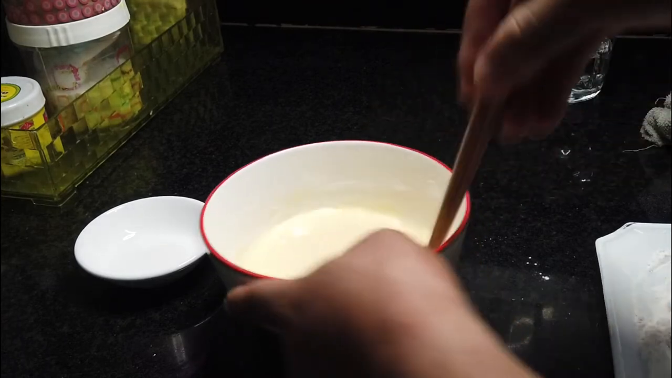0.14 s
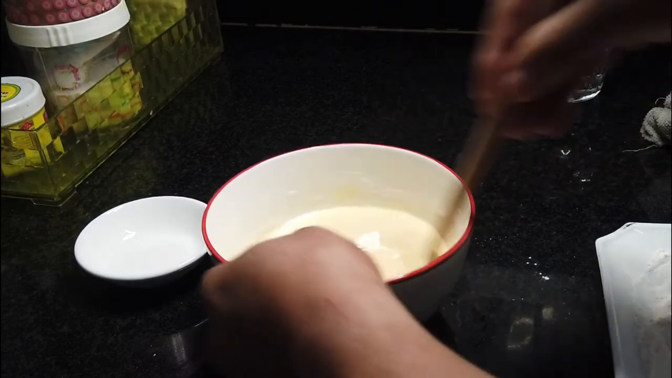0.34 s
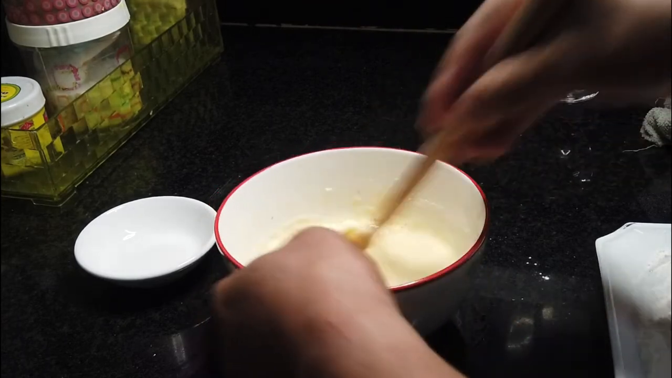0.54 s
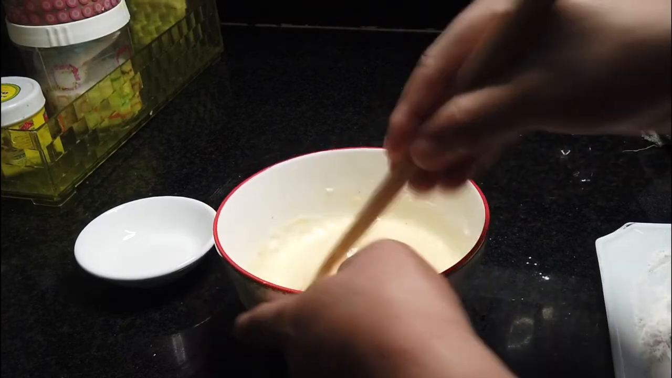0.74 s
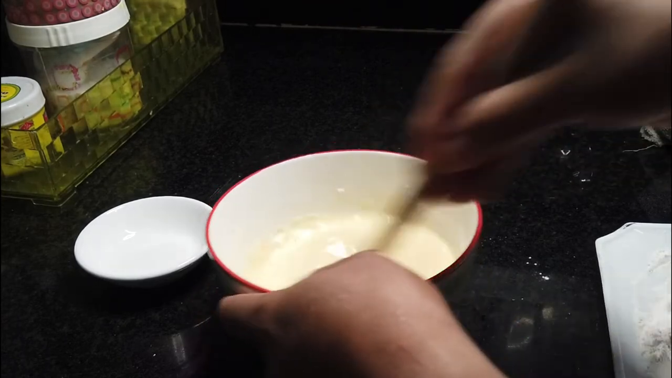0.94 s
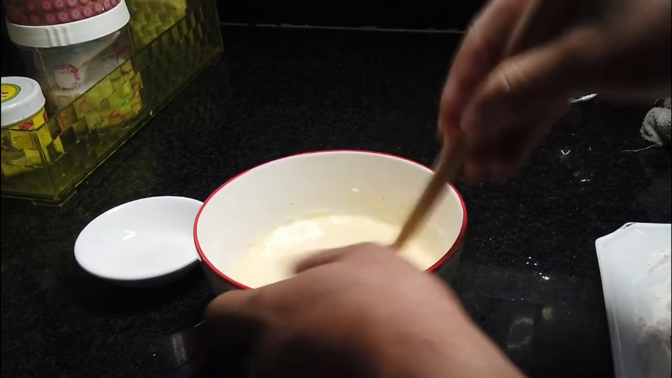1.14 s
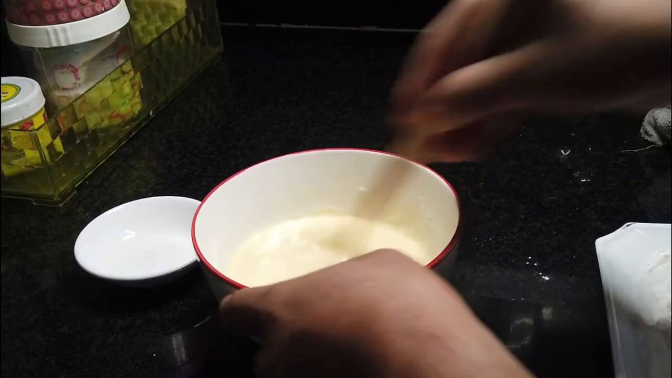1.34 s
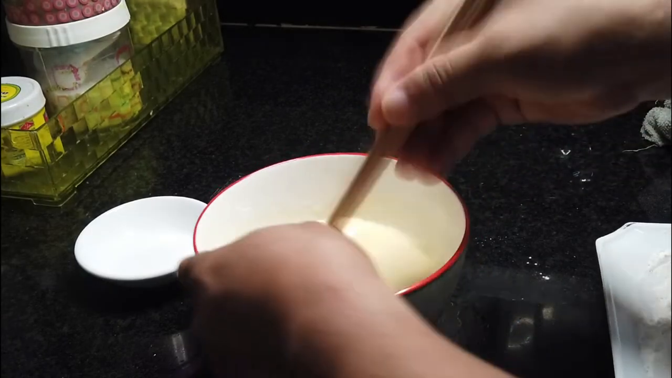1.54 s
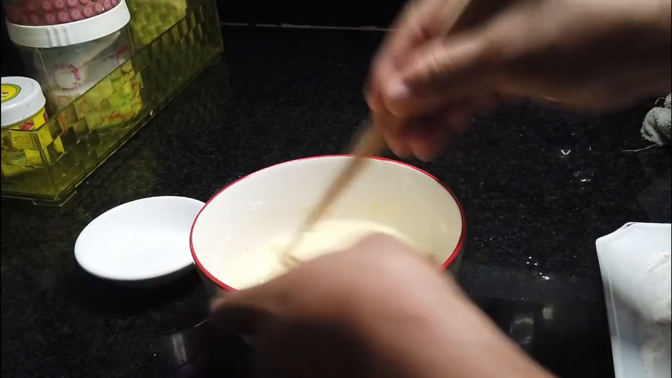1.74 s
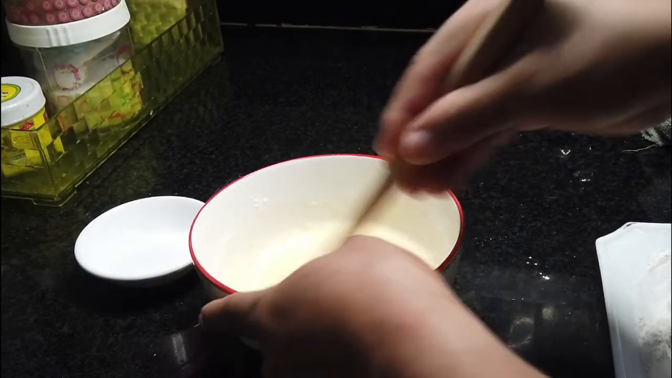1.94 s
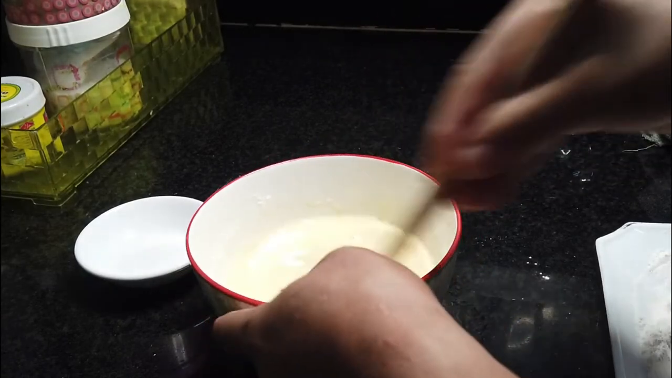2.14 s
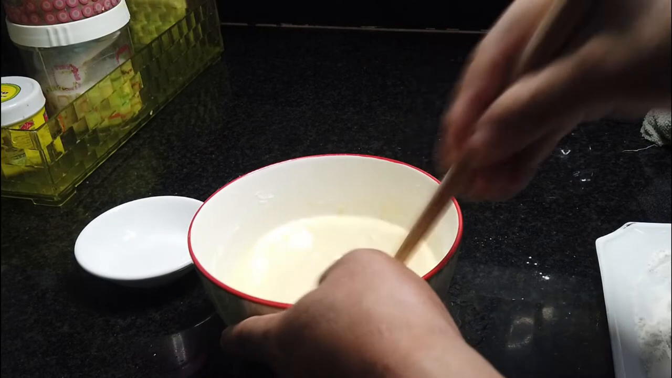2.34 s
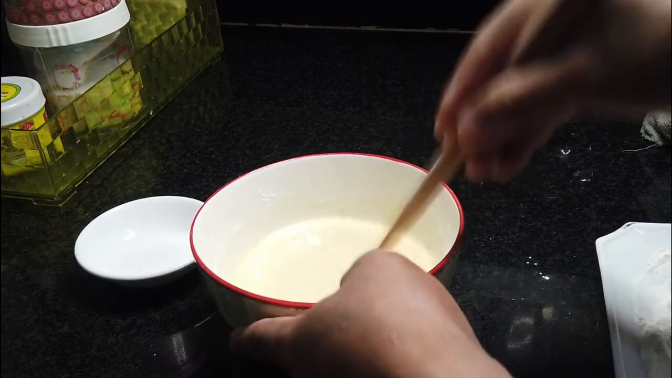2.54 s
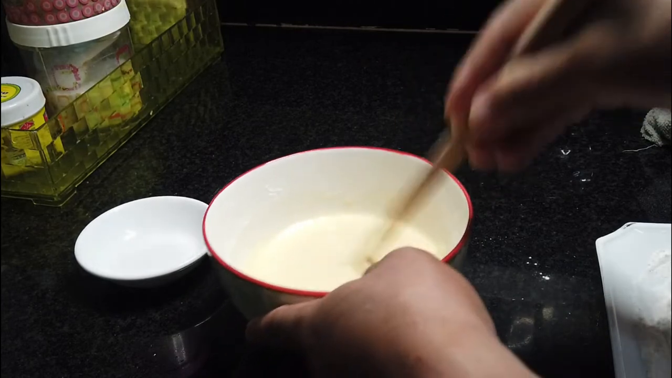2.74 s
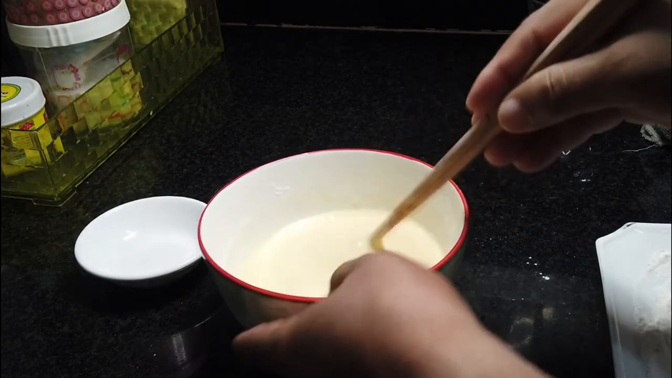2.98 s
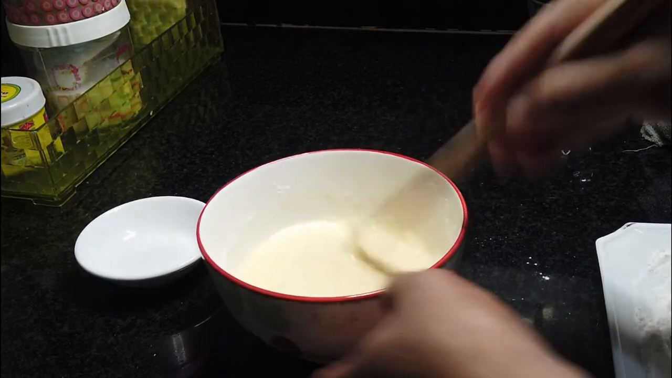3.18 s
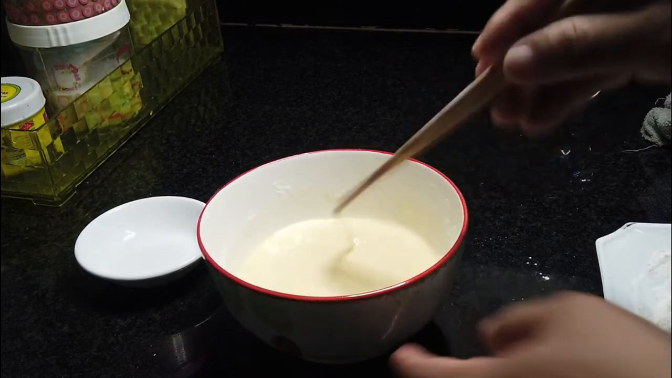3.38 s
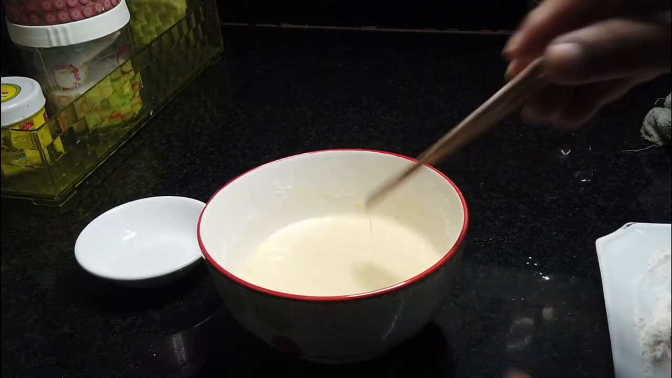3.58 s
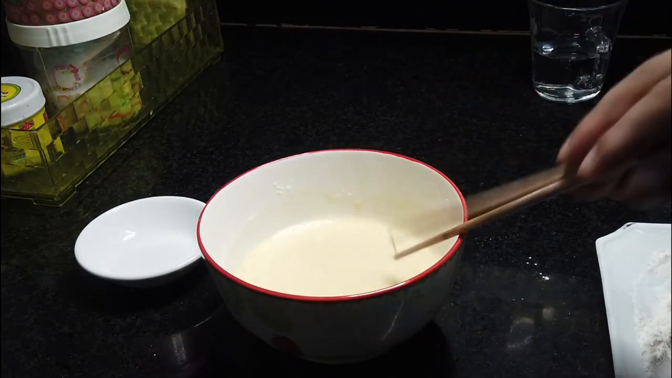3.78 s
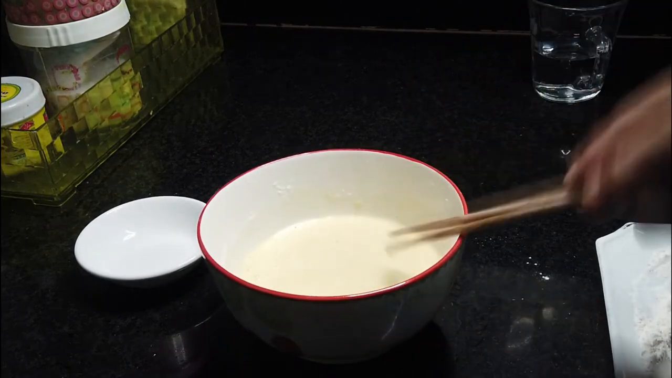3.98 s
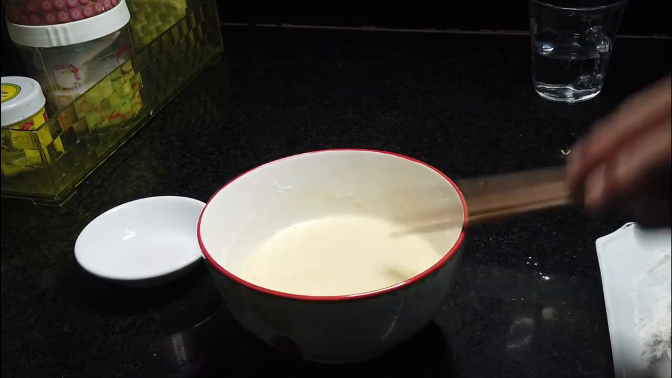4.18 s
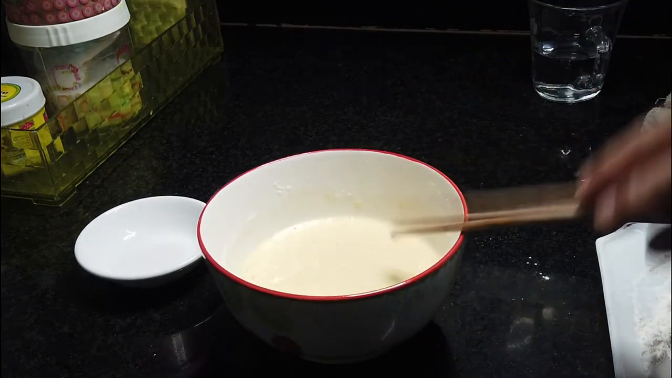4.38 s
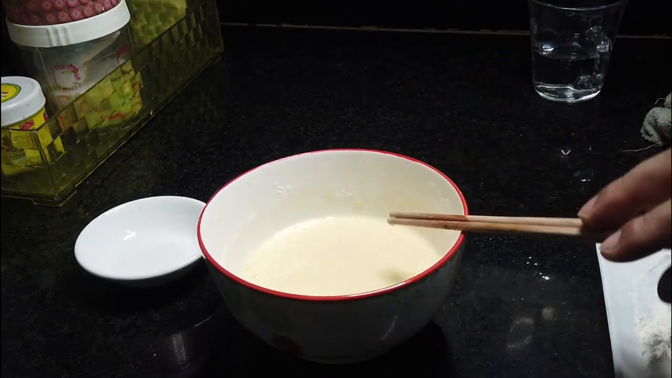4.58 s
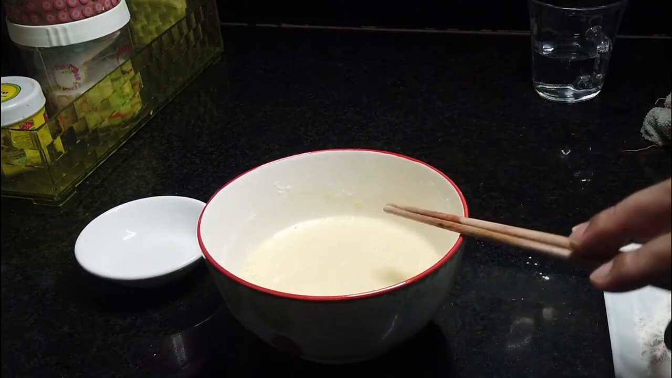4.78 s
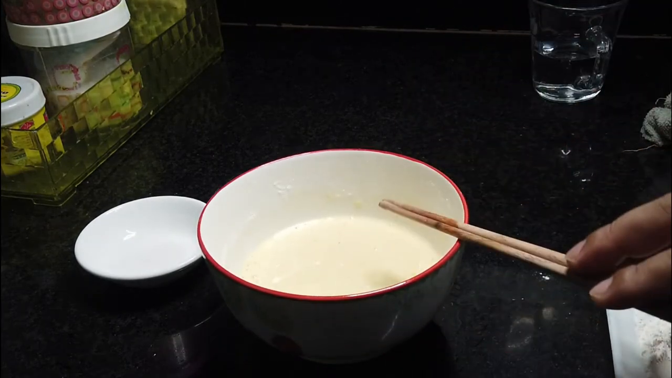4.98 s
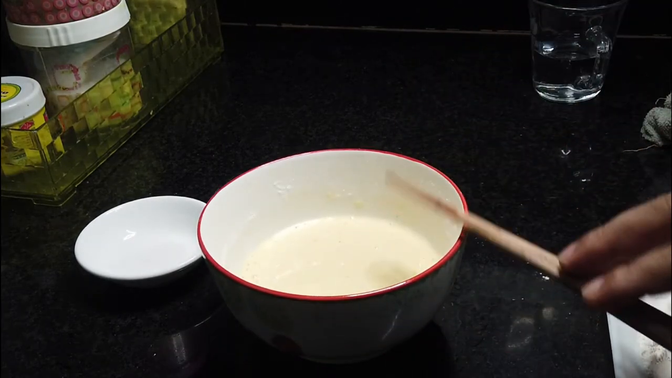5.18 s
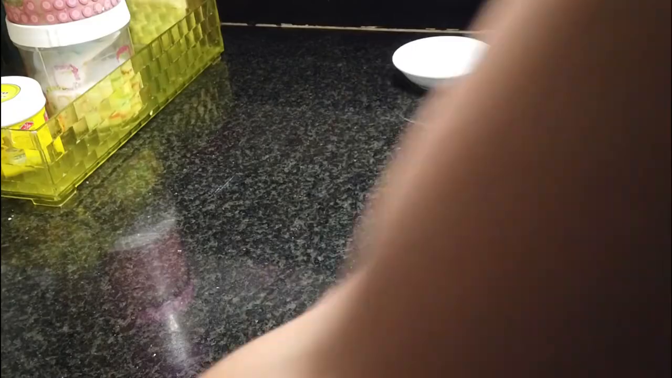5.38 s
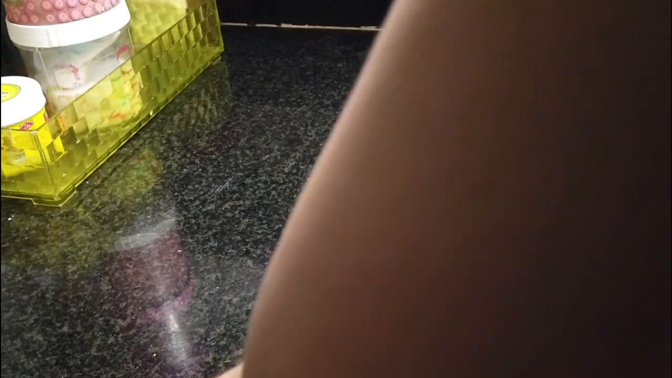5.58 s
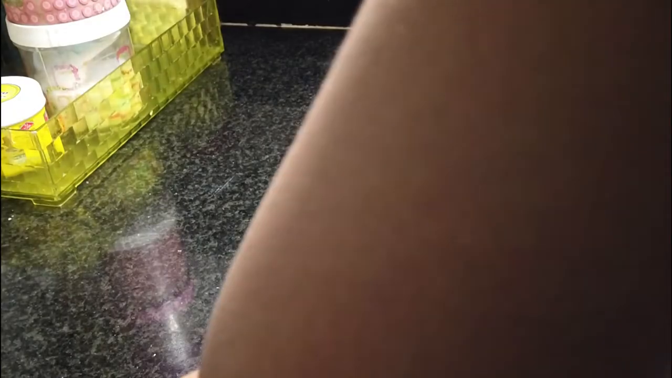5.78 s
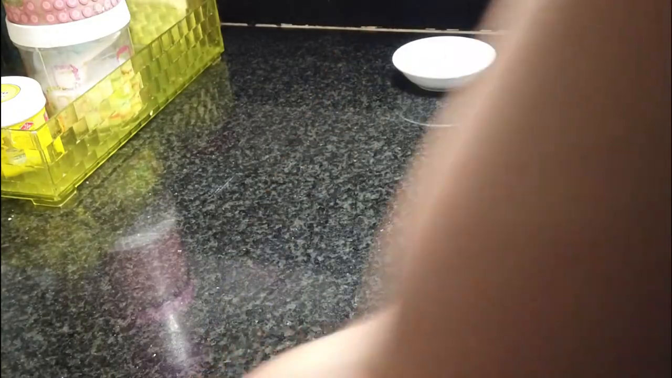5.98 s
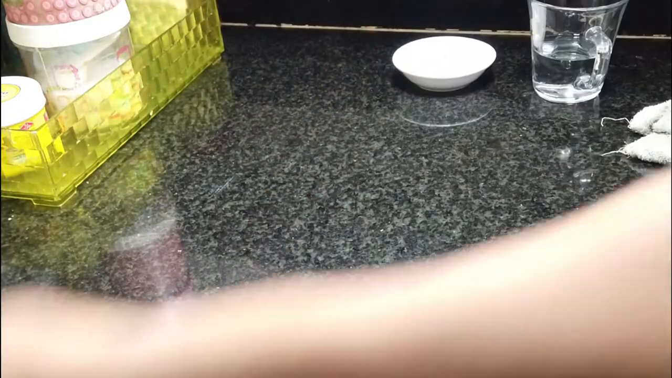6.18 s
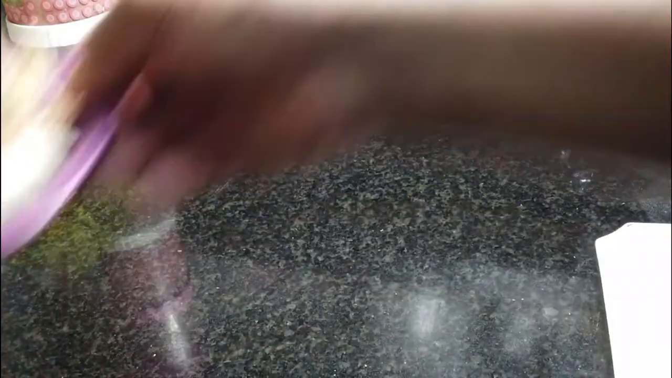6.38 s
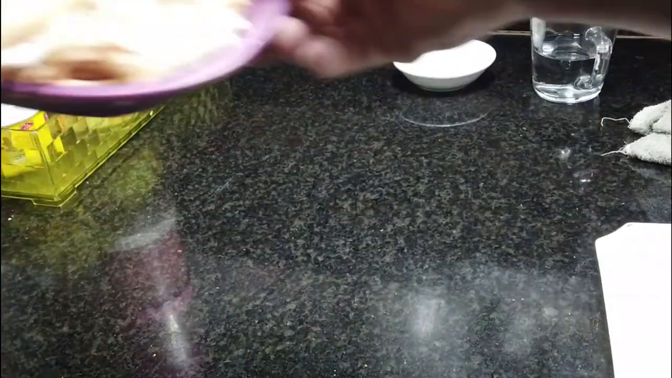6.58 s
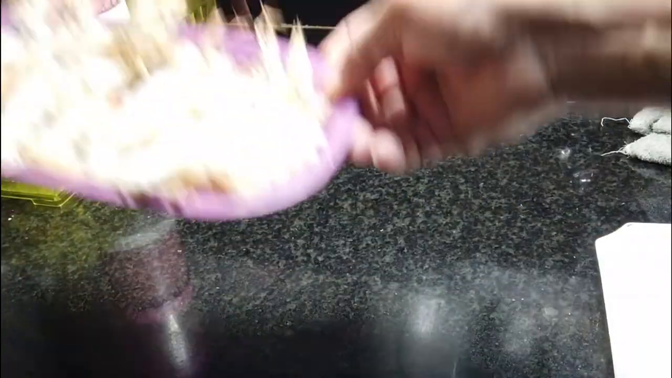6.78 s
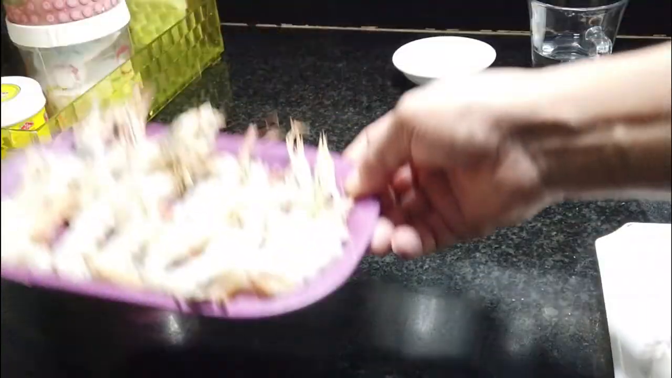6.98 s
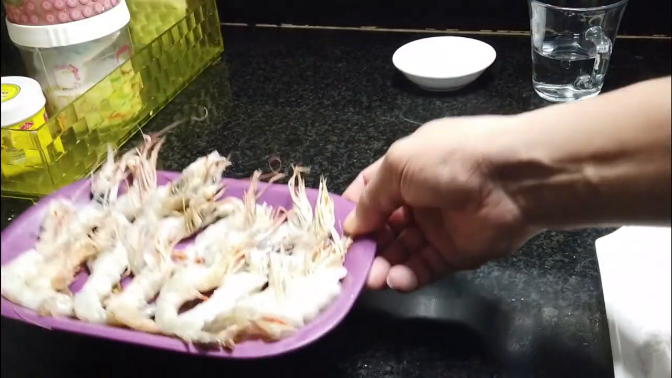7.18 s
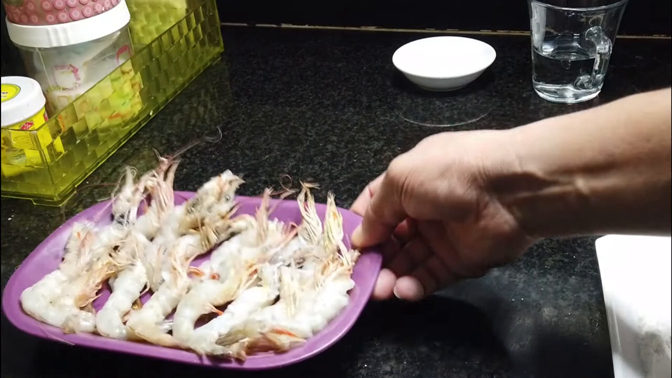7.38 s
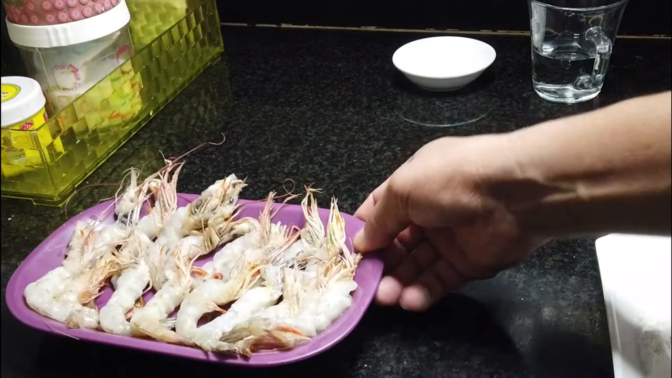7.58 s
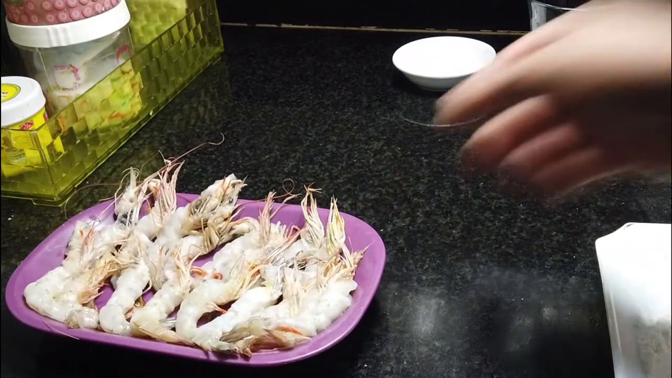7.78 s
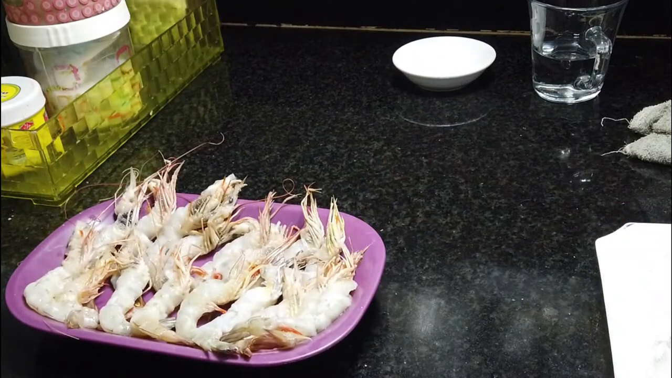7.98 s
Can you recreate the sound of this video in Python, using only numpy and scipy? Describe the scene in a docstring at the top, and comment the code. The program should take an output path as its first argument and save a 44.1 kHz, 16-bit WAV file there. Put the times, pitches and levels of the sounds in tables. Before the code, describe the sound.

Wet, irregular knocking and squelching of batter being whisked in a bowl, four bright rim taps, faint handling noises, and a tray clacking down.

```python
"""Wooden chopsticks beat batter in a ceramic bowl on a stone counter, in a small hard kitchen.
Knocks blend a noisy thud, ringing bowl modes and a rising plop; swarms of short sine bubbles squelch around them.
Filtered bursts make the sticks' clacks and the clinks' ticks; the sticks are tapped clean on a rim of ringing modes.
The bowl is moved aside and a plastic tray slaps down as noise bursts with decaying modes.
Beneath lie an appliance's wavering sine hum, filtered room noise and swelling puffs of air at the microphone."""
import sys
import numpy as np
from scipy import signal
from scipy.fft import rfft, irfft, next_fast_len
from scipy.io import wavfile

SR = 44100
rng = np.random.default_rng(int(sys.argv[2]) if len(sys.argv) > 2 else 0)


def generate_wav(signal):
    """Clip the signal to [-1, 1] and save it as 16-bit WAV at the path in sys.argv[1]."""
    frames = np.transpose(np.atleast_2d(signal))
    scaled = np.clip(frames, -1, 1) * 32767
    pcm = np.round(scaled).astype(np.int16)
    wavfile.write(sys.argv[1], SR, pcm)


N = 354563
HIT = int(.6 * SR)  # samples in one hit
ROOM_T60_S, PORT_GAP_M = 0.23, 0.046  # usual room decay; spacing of the two microphone ports
SOUND_SPEED_M_S = 343


def undb(db):
    """Decibels to gain."""
    return 10 ** (np.asarray(db) / 20)


def level(x, db):
    """Set the rms level."""
    return x * undb(db) / np.sqrt(np.mean(x ** 2))


def blow(x, db):
    """Set the rms level of the first 30 ms of a hit, the same at both ports."""
    onset = x[..., :int(.03 * SR)]
    return x * undb(db) / np.sqrt(np.mean(onset ** 2, axis=-1, keepdims=True))


def fade(t60):
    """Exponential decay over the length of a hit, falling 60 dB in t60 seconds."""
    return np.exp(-np.log(1000) * np.arange(HIT) / SR / max(t60, 1e-4))


def add(out, s, x):
    """Mix a sound in at time s."""
    i = int(np.clip(s * SR, 0, N - 1))
    out[:, i:i + x.shape[-1]] += x[..., :N - i]


def colour(x, points, tilt_db=0, pivot_hz=1000):
    """Causal filter through (Hz, dB) points, tilted by some dB an octave about a pivot."""
    hz, db = np.transpose(points)
    octave = np.log2(np.maximum(np.fft.rfftfreq(4096, 1 / SR), 1))
    db = db + tilt_db * np.log2(np.clip(hz, 500, 12000) / pivot_hz)
    # folding the cepstrum forward in time gives minimum phase
    cepstrum = irfft(np.log(undb(np.interp(octave, np.log2(hz), db))))
    cepstrum[1:2048] *= 2
    cepstrum[2049:] = 0
    response = irfft(np.exp(rfft(cepstrum)))
    return signal.fftconvolve(np.atleast_2d(x), response[None], axes=1)[:, :x.shape[-1]]


def diffuse(size):
    """Noise arriving from all sides at two closely spaced ports: alike in the bass, unrelated in the treble."""
    n = next_fast_len(size, True)
    likeness = np.sinc(2 * np.fft.rfftfreq(n, 1 / SR) * PORT_GAP_M / SOUND_SPEED_M_S)
    shares = np.sqrt([(1 + likeness) / 2, (1 - likeness) / 2])
    mid, side = rfft(rng.standard_normal((2, n))) * shares
    return irfft([mid + side, mid - side], n)[:, :size]


def walk(rate, size=N):
    """Smooth random wander with a spread near 1, passing through rate new values a second."""
    knots = rng.standard_normal(400)
    return np.interp(np.arange(size) / SR * rate, np.arange(len(knots)), knots)


def room(x, wet_db, t60):
    """Direct sound, then dense reflections from the counter and tiles."""
    tail = diffuse(HIT) * fade(t60) * (1 - fade(0.014))
    response = tail * undb(wet_db) / np.sqrt(np.sum(tail ** 2) / 2)
    response[:, 0] += 1
    return signal.fftconvolve(np.atleast_2d(x), response, axes=1)[:, :x.shape[-1]]


def ring(modes, detune):
    """Decaying modes, a little different at each blow, each reaching the two ports out of step."""
    t = np.arange(HIT) / SR
    out = 0
    for hz, db, t60 in modes:
        drift, size, angle = rng.standard_normal(3)
        # the lag grows with pitch up to a limit, and either port may lead
        most_lag = np.pi / 2.8 if hz < 7000 else np.pi / 4
        lag = min(np.pi * hz * PORT_GAP_M / SOUND_SPEED_M_S * .7, most_lag)
        lag = np.array([[1], [-1]]) * np.sign(angle) * lag
        tone = np.sin(2 * np.pi * hz * (1 + detune * drift) * t + lag)
        out = out + undb(db + 0.5 * size) * fade(t60) * tone
    return out


def contact(scrape_s):
    """One impulse and a chatter of slips; the longer the scrape, the more of the force is in the slips."""
    scrape_s = max(scrape_s, 1e-4)
    slips = rng.standard_normal(HIT) ** 3 * fade(scrape_s * np.log(1000))
    force = slips / np.linalg.norm(slips) * np.sqrt(scrape_s / 0.0022)
    force[0] += 1
    return force


def swell(start_s, attack_s, hold_s, t60):
    """Envelope that rises, holds until hold_s after its start, then dies away."""
    t = np.arange(N) / SR - start_s
    rise = np.clip(t / max(attack_s, 1e-3), 0, 1)
    return rise * np.exp(-np.log(1000) * np.maximum(t - hold_s, 0) / max(t60, 1e-3))


# appliance hum lines: (frequency [Hz], mean level [dB rms])
HUM_LINES = [(100, -50), (200, -64), (237.5, -56.5), (285, -62.5), (399.5, -51.5)]
# the upper hum dips briefly: (time [s], half-width [s], depth [dB])
UPPER_HUM_DIP = (7.24, 0.16, -7.5)
# low rush of the motor: (frequency [Hz], relative level [dB])
RUSH_COLOUR = [(20, 5), (60, 5), (130, -12.5), (180, -7), (260, -7), (400, -9), (600, -26.5), (2000, -59)]
# soft room noise: (frequency [Hz], relative level [dB])
ROOM_COLOUR = [(260, -53.5), (450, -17), (484, -3.5), (723, -3.5), (835, -5.5), (1080, -5.5), (1200, -5),
               (1300, -8), (1690, -11), (2320, -11.5), (3890, -22), (4430, -22), (7880, -28),
               (11000, -22.5), (14000, -32.5)]


def kitchen():
    """A wavering motor hum and its low rush, over soft room noise."""
    t = np.arange(N) / SR
    lines = []
    for hz, db in HUM_LINES:
        gain = np.sqrt(2) * undb(db + 1.5 * walk(4))
        lines.append(gain * np.sin(2 * np.pi * hz * t + .3 * walk(9)))
    dip_s, width_s, depth_db = UPPER_HUM_DIP
    dip = undb(depth_db * np.exp(-((t - dip_s) / width_s) ** 2))
    hum = sum(lines[:-1]) + lines[-1] * dip
    rush = level(colour(diffuse(N), RUSH_COLOUR), -47.0)
    room_noise = level(colour(diffuse(N), ROOM_COLOUR), -54.5)
    return hum + rush + room_noise * undb(.7 * walk(3))


# puffs of air from a passing arm: (peak time [s], relative level [dB], half-width [s])
AIR_PUFFS = [(0.27, -23, 0.036), (0.48, -18.5, 0.052), (0.679, -25.5, 0.032), (0.82, -24, 0.012),
             (0.895, -21, 0.011), (0.991, -15.5, 0.024), (1.3, -28, 0.094), (1.461, -25, 0.057),
             (3.68, -24, 0.02), (6.18, -29, 0.065), (6.45, -25.5, 0.084), (6.61, -31.5, 0.054)]
# the light draught between puffs: (time [s], relative level [dB])
LIGHT_DRAUGHT = [(0, -49), (0.2, -34), (1.4, -34), (1.62, -56), (1.85, -29.5), (2.25, -34), (2.83, -42.5),
                 (2.97, -58), (3.7, -41.5), (4.1, -54), (5.4, -61), (5.8, -45.5), (7.3, -53.5), (8.04, -57)]
# air rumble alike at both ports: (frequency [Hz], relative level [dB])
RUMBLE_COLOUR = [(10, -25), (25, 5), (55, 4.5), (90, 1), (150, -14.5), (300, -27), (800, -41), (4000, -100)]
# slow eddies, different at each port: (frequency [Hz], relative level [dB])
SLOW_EDDY_COLOUR = [(10, -13), (30, 11.5), (60, -2.5), (110, -16), (220, -44), (800, -76), (4000, -120)]


def draught():
    """Puffs of air from the moving arms rumble in the ports; the slowest eddies differ between them."""
    t = np.arange(N) / SR
    puffs = sum(undb(db) * np.exp(-((t - s) / width_s) ** 2) for s, db, width_s in AIR_PUFFS)
    breeze = undb(np.interp(t, *np.transpose(LIGHT_DRAUGHT)))
    shared = level(colour(rng.standard_normal(N), RUMBLE_COLOUR), 0)
    eddies = level(colour(rng.standard_normal((2, N)), SLOW_EDDY_COLOUR), 6)
    return level(shared + eddies, 1) * np.hypot(puffs, breeze)


# long sweeps of the sticks through the batter: (start [s], length [s], relative level [dB])
STICK_SWEEPS = [(0.418, 0.051, -32.5), (0.8, 0.052, -33.5), (1.095, 0.22, -33), (1.68, 0.19, -32.5),
                (2.643, 0.33, -39)]
SWEEP_ATTACK_S, SWEEP_T60_S = 0.011, 0.82
# the batter closes behind every knock: level relative to the knock, build-up, dying away
WAKE_DB, WAKE_ATTACK_S, WAKE_T60_S = -16, 0.006, 0.44


def stirring():
    """How hard the batter is worked: a wake behind each knock, the long sweeps, and steady churning."""
    wakes = sweeps = 0
    for s, db, _, _ in BATTER_KNOCKS:
        wake = swell(s, WAKE_ATTACK_S, WAKE_ATTACK_S, WAKE_T60_S)
        wakes = wakes + (undb(db + WAKE_DB) * wake) ** 2
    for s, length_s, db in STICK_SWEEPS:
        sweep = swell(s, SWEEP_ATTACK_S, length_s, SWEEP_T60_S)
        sweeps = sweeps + (undb(db) * sweep) ** 2
    churn_db = -53
    return np.sqrt(wakes + sweeps + undb(churn_db) ** 2)


WHISK_END_S = 3.75  # no pocket opens after this, and the fizz dies away


def pockets(cycles, count):
    """Air pockets of all sizes, each ringing for some cycles and rising a little as it closes."""
    t = np.arange(HIT // 10) / SR
    bubbles = np.zeros((1, N))
    for when, size, strength in rng.random((count, 3)):
        hz = 420 * 4.5 ** size
        life_s = cycles / hz
        bubble = np.exp(-t / life_s) * np.sin(2 * np.pi * hz * t * (1 + .015 * t / life_s))
        add(bubbles, when * WHISK_END_S, undb(12 * strength ** 2) * bubble)
    return bubbles


# thick batter: (frequency [Hz], relative level [dB])
SQUELCH_COLOUR = [(150, -17), (300, 3.5), (450, -10), (680, 1.5), (1200, 4), (1700, -3), (2600, 3),
                  (5000, -23), (16000, -78)]


def batter():
    """Many small pockets squelch in the thick batter and shake the bowl; a few longer-ringing ones plip."""
    folds = pockets(cycles=2.0, count=1300)
    squelch = level(colour(room(folds, wet_db=8.5, t60=ROOM_T60_S), SQUELCH_COLOUR), 0)
    murmur = signal.fftconvolve(ring(HELD_BOWL_MODES, detune=0.0054), folds, axes=1)[:, :N]
    murmur = level(colour(murmur, KNOCK_TONE), -4)
    plips = room(pockets(cycles=8, count=130), wet_db=0, t60=ROOM_T60_S)
    plips = level(colour(plips, SQUELCH_COLOUR), -1)
    return level(squelch + murmur + plips, -2.06) * stirring()


# tiny bubbles bursting on the beaten batter: (frequency [Hz], relative level [dB])
BUBBLE_COLOUR = [(2000, 0), (5000, -4), (8000, -9.5), (11300, -2.5), (13000, -7), (16000, -28)]
FIZZ_DB, FIZZ_FOLLOW = -63.5, 0.091  # rms level; how closely it follows the stirring, 0-1


def fizz():
    """A fine wet crackle of spiky noise for as long as the batter is worked."""
    pops = colour(room(rng.standard_normal(N) ** 3, wet_db=3.5, t60=ROOM_T60_S), BUBBLE_COLOUR)
    whisking = swell(0, 0, WHISK_END_S, WAKE_T60_S)
    return level(pops * stirring() ** FIZZ_FOLLOW * whisking, FIZZ_DB)


HOLLOW_T60_S, HOLLOW_RISE_PER_S = 0.15, 0.52  # decay; share of its pitch gained each second


def hollow(hz):
    """The plop of a pocket in the batter, rising as it closes and passing hz after 15 ms."""
    t = np.arange(HIT) / SR
    return fade(HOLLOW_T60_S) * np.sin(2 * np.pi * hz * t * (1 + HOLLOW_RISE_PER_S * (t / 2 - .015)))


SECOND_STICK_S, SECOND_STICK_DB = .011, -5.5  # middle of the random delay; level under the first


def both_sticks(x):
    """The second stick repeats the blow of the first, never at quite the same distance."""
    lag = int(np.clip(SECOND_STICK_S * rng.uniform(.5, 1.5) * SR, 1, HIT // 2))
    return x + undb(SECOND_STICK_DB) * np.pad(x, ((0, 0), (lag, 0)))[:, :HIT]


# knocks through the batter: (time [s], level [dB], brightness [dB/octave], pitch of the hollow opened [Hz])
BATTER_KNOCKS = [(0.001, -19.5, 0.5, 596), (0.078, -26, -6.5, 657), (0.253, -15.5, -1, 689),
                 (0.3153, -11, 4.5, 689.4), (0.45, -32.5, 3, 797), (0.746, -19.5, -2.5, 622),
                 (0.8635, -12.0, 3, 1082), (0.897, -25, -8, 864), (1.08, -28.5, -3.5, 700),
                 (1.254, -30.5, -5.5, 725), (1.283, -23, -5.5, 690), (1.423, -21.5, -4, 889),
                 (1.509, -27, 3, 606), (1.618, -20, -4, 616), (1.636, -24, -12, 687), (1.749, -14, 6, 1166),
                 (1.862, -19, 2.5, 720), (2.014, -13.5, 4.5, 1155), (2.295, -35.5, -3.5, 930),
                 (2.483, -13.5, -0.5, 732), (2.576, -15.5, -2, 1355), (2.66, -29.5, -4, 708),
                 (2.693, -21.5, -1, 853), (2.714, -22, -5, 878), (2.839, -13.5, 3.5, 631),
                 (2.901, -24, 0.5, 625), (3.036, -16, 0.5, 1287), (3.058, -19.5, 0, 691),
                 (3.097, -26.5, -6, 1020), (3.219, -38, -5.5, 680), (3.276, -24.5, -0.5, 614),
                 (3.426, -22.5, 6.5, 1353), (3.551, -29.5, -2.5, 696), (3.623, -36.5, -15, 735),
                 (4.13, -35, -10, 680)]
# the held bowl, damped by batter: (frequency [Hz], relative level [dB], t60 [s])
HELD_BOWL_MODES = [(593, -1, 0.35), (623, -15.5, 0.23), (698, 1, 0.33), (913, 7, 0.12), (1136, 14, 0.077),
                   (1180, 1, 0.18), (1255, -6.5, 0.44), (1412, 15, 0.084), (1477, -6.5, 0.34),
                   (1858, 12.5, 0.061), (1990, -5.5, 0.28)]
# tone of the knocks: (frequency [Hz], relative level [dB])
KNOCK_TONE = [(100, -20.5), (250, -5.5), (450, -10), (540, -6), (670, 4), (790, 0), (900, 0), (1170, -0.5),
              (1600, -6.5), (2400, -14.5), (3200, -29), (5000, -44.5), (9000, -77)]


def knocks():
    """Batter cushions the sticks; where it is thin the contact is harder and brighter."""
    out = np.zeros((2, N))
    for s, db, bright_db, hollow_hz in BATTER_KNOCKS:
        thud = room(contact(0.002), wet_db=11.0, t60=ROOM_T60_S)
        thud = blow(colour(both_sticks(thud), KNOCK_TONE, bright_db), 0)
        body = blow(colour(ring(HELD_BOWL_MODES, detune=.004), KNOCK_TONE, bright_db), 1.5)
        glug = blow(hollow(hollow_hz), -1.5)
        # the bowl and the batter take a moment to swing up
        swing = (body + glug) * (1 - fade(0.015))
        add(out, s, blow(thud + swing, db))
    return out


RING_RISE_S, RING_BLOOM_DB, RING_BLOOM_S = .09, 9, .13  # t60 of the rise; extra early level and its t60


def rim(modes):
    """The bowl's rim rings: a short bloom, then a long faint tail in which each mode flutters on its own."""
    bell = 0
    for mode in modes:
        flutter = undb(2.5 * walk(60, size=HIT))
        bell = bell + ring([mode], detune=.0005) * flutter
    # it swells as the sticks chatter, drops quickly while they rest on the rim, then hangs on
    bell = bell * (1 - fade(RING_RISE_S)) * (1 + undb(RING_BLOOM_DB) * fade(RING_BLOOM_S))
    return level(bell, 0) + level(room(bell[0], wet_db=10, t60=ROOM_T60_S), -9)


# short bright clinks near 2 kHz, mostly the rocked bowl touching the saucer beside it; the one at 1.75 s lends
# a loud knock a short 2 kHz ring: # (time [s], level [dB], dull tick over the clink [dB], rim ring over the
# whole touch [dB])
SAUCER_NUDGES = [(0.236, -32, 4, -14), (0.577, -34.5, -3.5, -15), (0.603, -37.5, -5, 3.5),
                 (1.5517, -25.5, -1, -18), (1.75, -21, -3.5, -22), (1.942, -33, -10, -9),
                 (3.248, -40.5, 2, -12)]
# the saucer: (frequency [Hz], relative level [dB], t60 [s])
SAUCER_RING = [(1870, 0, 0.03), (2193, 0, 0.029), (2353, -11, 0.07), (3930, -19, 0.064)]
HELD_RING, HELD_DULLING_DB = .6, -14  # a hand on the bowl shortens the ring (share) and dulls it (dB/octave)


def nudge():
    """Short clinks near 2 kHz, mostly china on china as the bowl shifts, each with a brief song of its hand-
    damped rim."""
    out = np.zeros((2, N))
    held = []
    for hz, gain_db, t60 in FREE_RIM_MODES[3:]:
        held.append((hz, gain_db + HELD_DULLING_DB * np.log2(hz / 1000), t60 * HELD_RING))
    for s, db, tick_db, rim_db in SAUCER_NUDGES:
        clink = blow(room(ring(SAUCER_RING, detune=0.00067)[0], wet_db=3.5, t60=0.14), 0)
        tick = room(contact(0.00077), wet_db=16, t60=0.26)
        tick = blow(colour(tick, SCUFF_TONE, tilt_db=-6.5), tick_db)
        add(out, s, blow(clink + tick, db) + blow(rim(held), db + rim_db))
    return out


# bare wood clacking: (time [s], relative treble level [dB], brightness [dB/octave], scrape time constant [s])
STICK_CLACKS = [(0.238, -31, -3.5, 0.0022), (0.3158, -44.5, -17, 0.0015), (0.923, -51, -16, 0.0027),
                (1.5523, -29.5, 1, 0.0035), (1.75, -35.5, -13, 0.0066), (1.943, -50.5, -16.5, 0.00066),
                (2.694, -29.5, -9, 0.0022), (2.89, -23.5, -2, 0.0032), (3.097, -37, -13, 0.0022),
                (3.425, -30, -8.5, 0.0071), (3.789, -30.5, 0.5, 0.00095)]
# tone of bare wood: (frequency [Hz], relative level [dB])
CLACK_TONE = [(200, -40), (900, -20), (1800, -7.5), (3300, -4.5), (3900, -6), (5100, -0.5), (6300, -4.5),
              (7200, -3), (9200, -6), (11000, 5), (13000, -1.5), (16000, -22)]


def clacks():
    """Dry wood on wood: a sharp tick or a short skid that rattles about the bowl and lights up the room."""
    out = np.zeros((2, N))
    for s, db, bright_db, scrape_s in STICK_CLACKS:
        force = contact(scrape_s)
        in_bowl = room(force, wet_db=12, t60=0.12)
        in_kitchen = room(force, wet_db=21, t60=0.29)
        rattle = undb(2.2 * walk(130, size=HIT))
        tick = (blow(in_bowl, 0) + blow(in_kitchen, -2.5)) * rattle
        add(out, s, colour(blow(tick, db + 3.5), CLACK_TONE, bright_db, pivot_hz=7000))
    return out


# taps on the rim: (time [s], stick clatter [dB], its brightness [dB/octave], thunk of the wall [dB],
# low ring [dB], high ring [dB], ring length [multiple of t60])
RIM_TAPS = [(3.937, -21.5, 1, -34, -26.5, -19.5, .9), (4.189, -20.5, -1.5, -28.5, -29, -20, 1.15),
            (4.402, -24, -1, -38.5, -40.5, -24, 1), (4.591, -24, -1.5, -25.5, -28, -24, .9)]
# the free bowl: wall mode, low rim pair, then the high rim modes, mostly in beating pairs:
# (frequency [Hz], relative level [dB], base t60 [s])
FREE_RIM_MODES = [(690, 0, .13), (944, -4, .17), (968, 0, .33), (2269, -6, .26), (2284, -8, .28),
                  (2845, -18, .25), (3976, 0, .36), (3988, -3, .4), (4040, -7, .18), (4724, -15, .22),
                  (6060, -5, .2), (6080, -11, .3), (8260, -14, .16), (8457, -5, .31), (8475, -10, .27),
                  (11200, -7, .16)]
# tone of the stick clatter: (frequency [Hz], relative level [dB])
TAP_TONE = [(200, -29), (450, -15), (700, 2), (1150, -4.5), (1800, -12.5), (2600, -8), (4300, -4.5),
            (5300, -9.5), (6100, -4.5), (7000, -13.5), (8200, -6.5), (10000, -18.5), (11100, -9),
            (13000, -19), (16000, -32)]


def taps():
    """The two sticks chatter on the rim and the free bowl rings, longer the more cleanly they leave it."""
    out = np.zeros((2, N))
    for s, db, bright_db, wall_db, low_db, high_db, length in RIM_TAPS:
        chatter = room(contact(0.0036), wet_db=15, t60=0.22)
        clatter = blow(colour(both_sticks(chatter), TAP_TONE, bright_db), db)
        modes = [(hz, gain_db, t60 * length) for hz, gain_db, t60 in FREE_RIM_MODES]
        wall = blow(rim(modes[:1]), wall_db)
        low_ring = blow(rim(modes[1:3]), low_db)
        high_ring = blow(rim(modes[3:]), high_db)
        add(out, s, clatter + wall + low_ring + high_ring)
    return out


# faint ticks of things being put away or settling: (time [s], level [dB], pitch [Hz])
SETTLING_TICKS = [(5.416, -55, 2460), (5.503, -56, 2560), (7.749, -44, 2700), (7.822, -57, 3800)]


def ticks():
    """Light ticks, each one very short mode heard mostly through the room."""
    out = np.zeros((2, N))
    for s, db, hz in SETTLING_TICKS:
        tick = ring([(hz, 0, .006)], detune=.005)[0]
        add(out, s, blow(room(tick, wet_db=11, t60=ROOM_T60_S), db))
    return out


# dishes handled on the counter:
# (time [s], level [dB], brightness [dB/octave], scrape time constant [s], ring over the slap [dB])
DISH_HITS = [(5.701, -37, -9.5, 0.02, -9), (5.939, -43.5, -16.5, 0.018, -19),
             (6.034, -47, -23.5, 0.0069, -3), (7.578, -39, 2, 0.015, -16),
             (7.586, -18.5, -0.5, 0.0025, -2.5), (7.5936, -23.5, -1, 0.0029, -15),
             (7.626, -31.5, -3.5, 0.0057, 7), (7.749, -39, -7, 0.0068, -20)]
# the tray and bowl on the counter: (frequency [Hz], relative level [dB], t60 [s])
DISH_RING = [(635, -4, .2), (1030, -1, .1), (1260, 0, .08), (1420, 2, .13), (1500, 3, .18), (1604, 0, .24),
             (2385, -5, .28), (2560, -4, .24), (2821, -4, .2)]
# a dish slapping on stone: (frequency [Hz], relative level [dB])
SLAP_COLOUR = [(100, -22), (300, -11), (600, -4), (1000, -1), (1450, 2), (1750, -4), (2100, -9), (2500, -4),
               (3300, -9), (4300, -10), (6000, -15), (9000, -22), (12000, -23), (16000, -44)]
# the counter under the full bowl: (frequency [Hz], relative level [dB], t60 [s])
COUNTER_RING = [(175, 22, 0.2), (203.3, 19, 1), (258, 14, 1)]
BUMP_S, BUMP_DB = 5.965, -44.5


def dishes():
    """The bowl is set aside with a low bump; the tray lands edge first, slaps flat, rebounds and settles."""
    out = np.zeros((2, N))
    for s, db, bright_db, scrape_s, ring_db in DISH_HITS:
        slap = room(contact(scrape_s), wet_db=1.5, t60=0.25)
        slap = blow(colour(slap, SLAP_COLOUR, bright_db), 0)
        body = blow(colour(ring(DISH_RING, detune=0.0053), SLAP_COLOUR, bright_db), ring_db)
        add(out, s, blow(slap + body, db))
    bump = ring(COUNTER_RING, detune=0.0023) * (1 - fade(0.042))
    add(out, BUMP_S, blow(bump, BUMP_DB))
    return out


# the tray scuffing as it is picked up: (frequency [Hz], relative level [dB])
SCUFF_TONE = [(200, -10), (650, -5), (950, 9), (1400, -0.5), (1900, -3), (2550, 5), (3500, -4.5),
              (4100, -16), (5600, -11.5), (9000, -22), (13000, -14), (16000, -41)]
SCUFF_S, SCUFF_SCRAPE_S, SCUFF_DB = 6.207, 0.026, -37  # time; scrape time constant; level


def scuff():
    """The plastic tray skids briefly on the stone: one scrape, mostly heard through the room."""
    out = np.zeros((2, N))
    skid = colour(room(contact(SCUFF_SCRAPE_S), wet_db=35, t60=0.36), SCUFF_TONE)
    add(out, SCUFF_S, blow(skid, SCUFF_DB))
    return out


def scene():
    """Everything on the counter, over the sound of the room."""
    background = kitchen() + draught()
    whisking = batter() + fizz() + knocks() + nudge() + clacks()
    clearing_up = taps() + ticks() + dishes() + scuff()
    return background + whisking + clearing_up


def record(dry):
    """The recorder clips at full scale, then cuts the top above 15.8 kHz with a steep low-pass."""
    top_cut = signal.ellip(8, .2, 70, 15800, fs=SR, output="sos")
    return signal.sosfilt(top_cut, np.clip(dry, -1, 1))


dry = scene()
out = record(dry)
generate_wav(out)
```